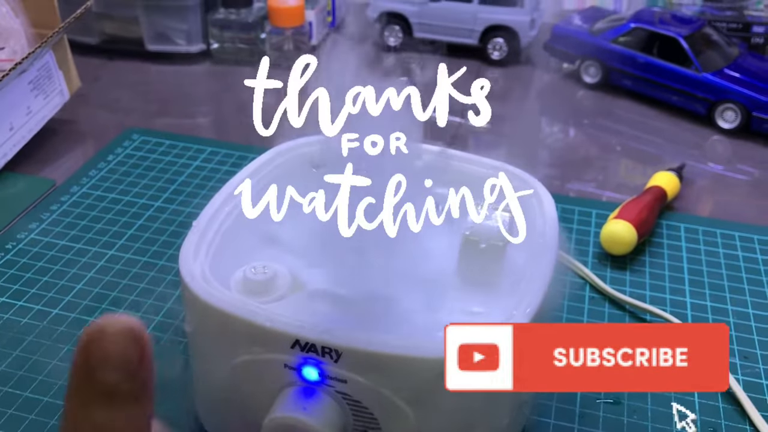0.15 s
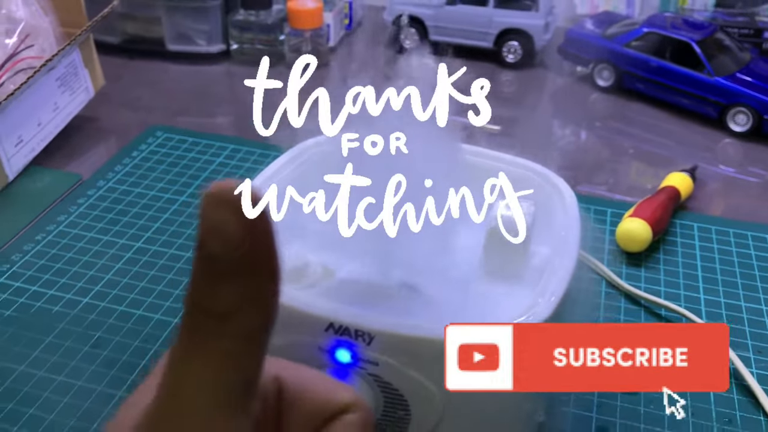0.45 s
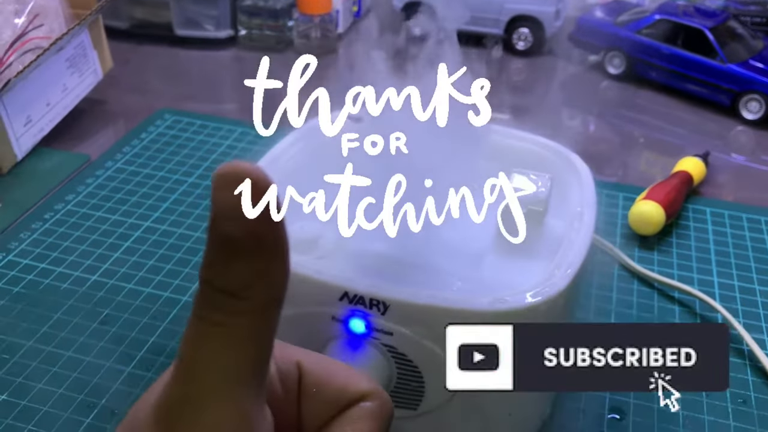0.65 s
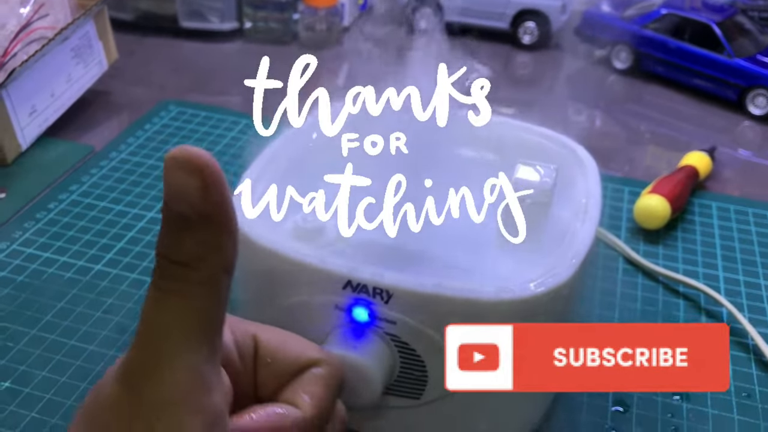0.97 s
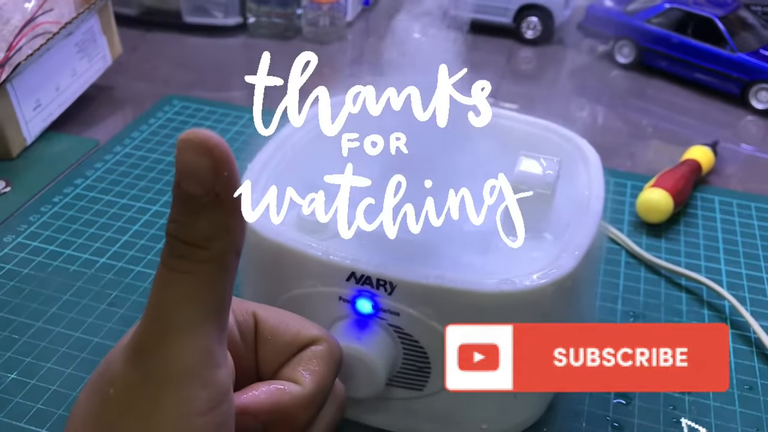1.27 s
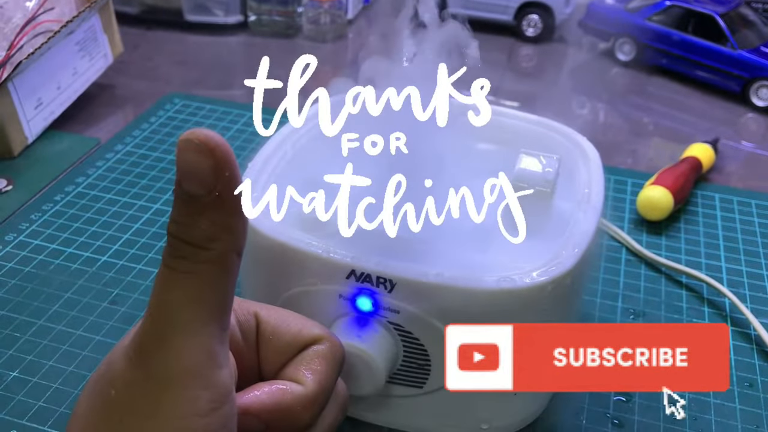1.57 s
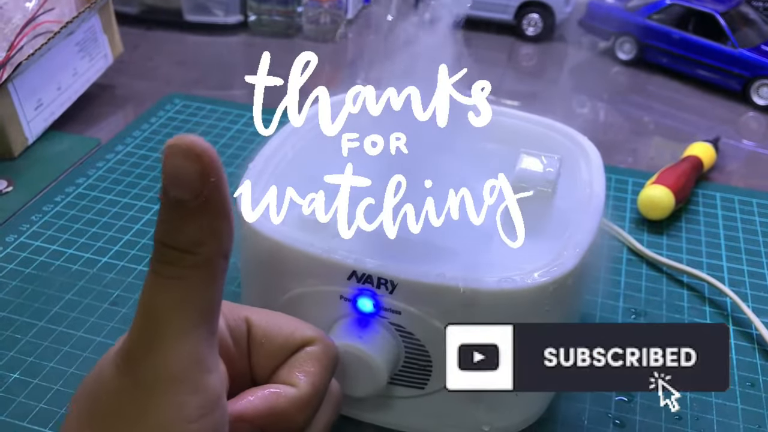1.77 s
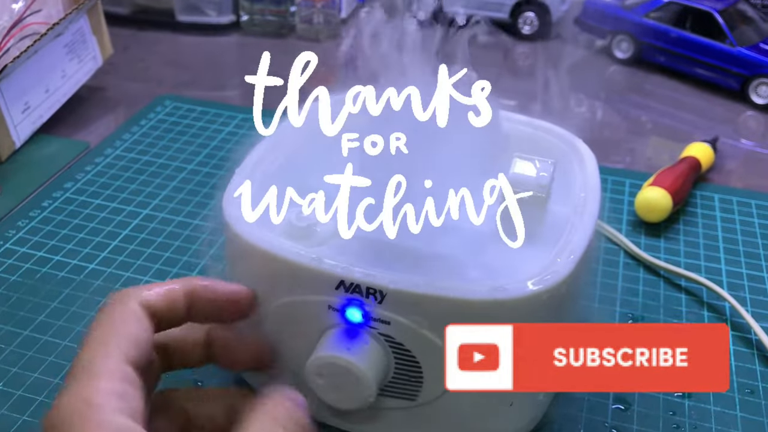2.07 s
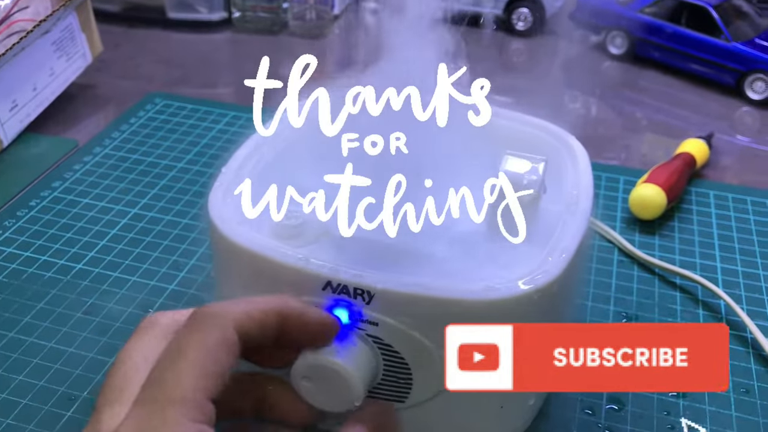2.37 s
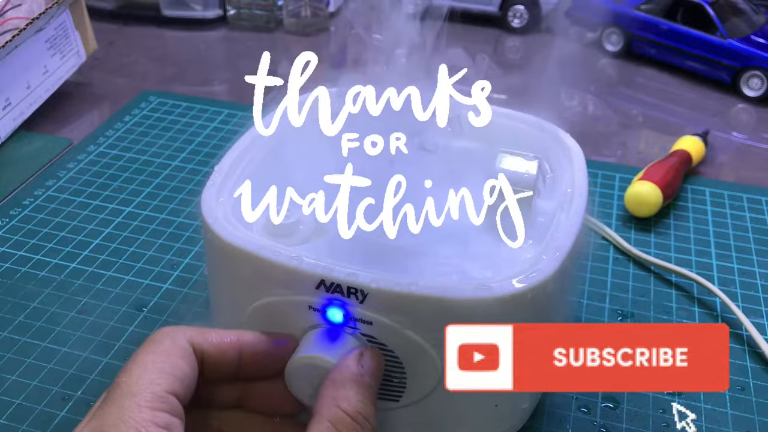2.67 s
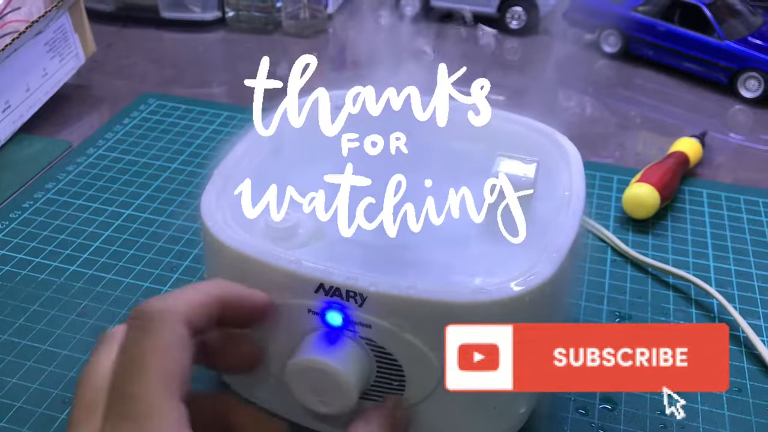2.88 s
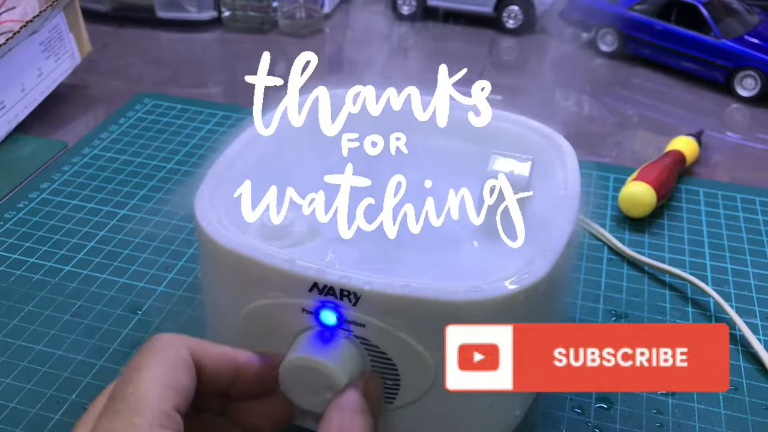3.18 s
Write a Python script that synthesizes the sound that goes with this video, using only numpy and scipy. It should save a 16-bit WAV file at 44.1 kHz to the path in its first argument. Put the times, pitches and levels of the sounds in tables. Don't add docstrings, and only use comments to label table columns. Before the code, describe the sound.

Close up on a desk, a small humidifier sprays bright, fizzing mist with sharp droplet snaps; one watery gulp, then a hard plastic click, smaller knob taps and a dull bump before the spray dies down.

```python
import sys
import numpy as np
from scipy import signal
from scipy.fft import rfft, irfft
from scipy.io import wavfile

SR = 44100
rng = np.random.default_rng(int(sys.argv[2]) if len(sys.argv) > 2 else 0)


def master_out(mix):
    frames = np.transpose(np.atleast_2d(mix))
    ceiling = np.clip(frames, -1, 1)
    pcm = np.round(ceiling * 32767).astype(np.int16)
    wavfile.write(sys.argv[1], SR, pcm)


def boost(x):
    u = np.asarray(x, float) / 20
    return 10 ** u


N = 146853


def rms_one(x):
    return x / np.sqrt(np.mean(x ** 2) + 1e-20)


def drift(rate):
    pole = np.exp(-80 * np.pi * rate / SR)
    slow = signal.lfilter([1], [1, -2 * pole, pole * pole], rng.standard_normal(N // 40 + 2002))[2000:]
    return np.interp(np.arange(N) / 40, np.arange(len(slow)), rms_one(slow - slow.mean()))


def ring(clicks, hz, t60):
    r, w = boost(-60 / (t60 * SR)), 2 * np.pi * hz / SR
    return signal.lfilter([0, np.sin(w)], [1, -2 * r * np.cos(w), r * r], clicks + 1e-18)


def coloured(spectrum, patchy_db, shared_db):
    hz = np.arange(N // 2 + 1) * SR / N + 1e-3
    at, db = np.transpose(spectrum)
    noise = rfft(rng.standard_normal(N)) * boost(np.interp(np.log(hz), np.log(at), db, -200, -200))
    place = 2 * np.log2(hz / at[0])
    out = 0
    for k in range(int(2 * np.log2(at[-1] / at[0])) + 2):
        strip = np.cos(np.pi / 2 * np.clip(place - k, -1, 1)) ** 2
        out = out + boost(patchy_db * drift(22)) * irfft(noise * strip, N)
    return rms_one(out * boost(shared_db * drift(22)))


def add(track, s, x):
    i = int(s * SR)
    track[i:i + len(x)] += x[:len(track) - i]


# (frequency [Hz], density [dB per Hz])
ROOM_RUMBLE = [(24, -15), (30, -5.5), (60, -3), (86, -3.5), (100, -10.5), (125, -8.5), (330, -13),
               (430, -62)]
# (frequency [Hz], density [dB per Hz])
FAN_AIR = [(190, -52), (330, -13), (424, -1.5), (532, -18), (583, -6), (918, -18.5), (950, -16.5),
           (1030, -14.5), (5000, -28), (6500, -27), (11000, -120)]
# (frequency [Hz], width [Hz], level [dB rms])
TANK_RESONANCES = [(387.3, 48.5, -71), (432, 39, -68), (466.3, 53, -79), (571.3, 52, -82), (1251, 45, -83),
                   (776, 48, -85), (2660, 590, -80), (123.3, 19, -79), (302.5, 16, -79)]
# (frequency [Hz], level [dB rms], waver [dB])
MOTOR_TONES = [(60.4, -64, 3), (34.5, -70.5, 0.5), (82.7, -75, 4), (973.5, -80.5, 4), (1944, -90, 5),
               (2670, -89.5, 7), (218, -86.5, 0.5)]


def fan():
    out = boost(-67.5) * coloured(ROOM_RUMBLE, 0, 0) + boost(-69) * coloured(FAN_AIR, 0.51, 0.89)
    for hz, width_hz, db in TANK_RESONANCES:
        t60 = 1.8 / width_hz
        stirred = ring(ring(rng.standard_normal(N), hz, t60), hz, t60)
        out += boost(db) * rms_one(stirred)
    for hz, db, waver_db in MOTOR_TONES:
        level = np.sqrt(2) * boost(db + waver_db * np.tanh(drift(4)))
        speed = 1 + .002 * drift(3.74)
        out += level * np.sin(2 * np.pi * np.cumsum(hz * speed) / SR)
    return out


# (time [s], hiss level [dB])
FOUNTAIN = [
    (0.0, -64),
    (0.33, -61),
    (0.62, -64),
    (1.32, -61.5),
    (1.68, -63),
    (2.22, -62),
    (2.87, -66),
    (3.0, -68),
    (3.33, -74),
]


def vigour():
    return np.interp(np.arange(N) / SR, *np.transpose(FOUNTAIN))


# (frequency [Hz], density [dB per Hz])
HISS_COLOUR = [(3000, -5.5), (4020, -9.5), (8200, -8), (9700, -5), (10400, -9), (11500, -4.5),
               (15000, -1.5), (16500, 2)]


def hiss(mist_db):
    return boost(mist_db - 2.0) * coloured(HISS_COLOUR, 1.7, 1.0)


def spray(mist_db):
    per_s, level_db, spread_db, follows = 180, 2.5, 4.5, 1.6
    sizes = boost(spread_db * np.minimum(rng.exponential(1, N), 2.8)) * rng.choice([-1, 1], N)
    density_db = 5 * drift(8) + follows * (mist_db - mist_db.mean())
    born = rng.random(N) < per_s * boost(density_db) / SR
    dealt = rng.integers(0, 12, N)
    rings = np.zeros(N)
    for k, hz in enumerate(np.geomspace(11800, 15600, 12)):
        soft_clicks = ring(sizes * born * (dealt == k), hz, 8 / hz) * hz / SR
        rings += ring(soft_clicks, hz, 18 / hz)
    return boost(mist_db + level_db) * rings


# (time [s], peak level
# [dB], pitch [Hz], snap [dB])
BURSTS = [(0.2473, -43, 15000, 9), (0.293, -46.5, 4220, -15), (0.3673, -36, 15000, 7),
          (0.398, -39, 6930, 4.5), (0.426, -52, 10600, 11), (0.4354, -38.5, 12560, 4),
          (0.4858, -47, 14600, 1), (0.5975, -46.5, 11700, 8), (0.6868, -48, 11800, 5),
          (0.7826, -42, 15100, 4), (0.959, -37, 14100, 1), (1.0924, -40.5, 12100, -3),
          (1.3578, -44.5, 11300, 4), (1.4094, -44, 15700, -6), (1.444, -34.5, 15500, -2),
          (1.5484, -48.5, 12200, 9), (1.6267, -34.5, 14100, 1), (1.8716, -44, 8800, 5),
          (1.9106, -40, 15300, -3), (1.9415, -36.5, 14300, -1), (2.034, -35, 13900, -3),
          (2.0677, -39, 9050, -14), (2.2024, -43, 13900, 7), (2.221, -39, 9000, 2),
          (2.3156, -45, 10000, 7.5), (2.5476, -48.5, 9700, 2), (2.6738, -41, 13800, -3),
          (2.9317, -43.5, 13600, 8),
          (.2926, -54.5, 3300, -10), (.398, -55, 4200, -12), (0.4, -47, 7500, -6),
               (0.401, -48, 6200, -2), (.558, -54.5, 3730, -2), (1.172, -54, 7200, -8),
               (1.3838, -49.5, 8900, 10), (1.9392, -55, 4750, -10), (2.0465, -42, 12200, -6),
               (2.080, -49, 13500, 2), (2.224, -44.5, 9400, 7), (2.2515, -51, 11500, 2),
               (2.428, -57, 6150, -10), (2.5735, -48, 14200, 4), (2.593, -59, 3720, 0),
               (2.7911, -51, 14500, 4), (2.799, -50, 14500, 6), (2.806, -47, 14000, 3),
               (2.806, -57, 8500, 3), (2.9148, -47, 13900, 3), (2.927, -49, 3230, -7),
               (2.9404, -59, 10100, 19), (3.251, -59, 11600, 4)]
# (time [s], peak level [dB], pitch [Hz], snap
# [dB])
MORE_BURSTS = [
    (2.0352, -48, 9300, 8),
    (2.0583, -44, 11300, 6),
    (2.0584, -44, 14000, 0),
    (2.059, -44, 8000, -8),
    (3.1979, -42, 11300, 3),
    (3.198, -48, 15000, 0),
]


def drops():
    ring_cycles, pitch_rise, lag_s, snap_s = 20, .1, .0011, .0005
    events = BURSTS + MORE_BURSTS
    out, t = np.zeros(N), np.arange(900) / SR
    snaps = np.diff(rng.standard_normal((len(events), 901))) * np.exp(-t / snap_s)
    for (s, db, hz, snap_db), snap in zip(events, snaps):
        cycles = hz * t
        pitch = 1 - pitch_rise * np.exp(-4 * cycles / ring_cycles)
        envelope = boost(-30 * cycles / ring_cycles) * np.minimum(cycles / 2, 1)
        tone = np.sin(2 * np.pi * np.cumsum(hz * pitch) / SR) * envelope
        band = signal.butter(4, [.9 * hz, min(1.6 * hz, 18000)], "band", fs=SR, output="sos")
        snap = signal.sosfilt(band, snap)
        add(out, s + lag_s, boost(db) * (tone + boost(snap_db) * .5 * snap / np.abs(snap).max()))
    return out


# (start [s], peak level [dB], frequency [Hz], length [s])
DESK_BUMPS = [
    (1.385, -52, 68, .08),
    (2.914, -46.5, 63, .097),
    (3.028, -53, 62, .065),
    (3.112, -57, 55, .07),
]


def bumps():
    out = np.zeros(N)
    for s, db, hz, length in DESK_BUMPS:
        t = np.arange(int(length * SR)) / SR
        add(out, s, boost(db) * np.sin(np.pi * t / length) ** 2 * np.cos(2 * np.pi * hz * t))
    return out


# (time [s], peak level [dB], crack [Hz], shell ring [dB], high tick [dB])
KNOB_TAPS = [(1.3853, -44, 3000, -4, -16), (2.0597, -34.5, 2000, -6, -8), (2.0594, -44, 5600, -20, -8),
             (2.1188, -53, 800, -6, -14), (2.1222, -52, 700, -10, -20), (2.5395, -58, 1500, -4, -4),
             (2.7921, -46, 4600, -16, -5), (2.7929, -47, 1100, -5, -20), (2.7952, -48, 800, -12, -20),
             (2.837, -61, 1800, -8, -6), (2.9298, -57, 900, -8, -20)]
# (frequency [Hz], level [dB], t60 [s])
SHELL_MODES = [(690, -2.5, 0.01), (810, -1.5, 0.015), (1003, -4, 0.018), (1106, 1, 0.033),
               (1437, 5.5, 0.015), (1626, -2, 0.029), (2026, -1.5, 0.0067), (2347, -16, 0.11),
               (2650, 3, 0.0067), (3300, -7.5, 0.021), (3510, -6, 0.014), (4200, -6.5, 0.015),
               (4750, -2.5, 0.011), (5780, 5.5, 0.0022)]


def hand():
    crack_cycles, tick_s = 6, .0002
    out, t = np.zeros(N), np.arange(600) / SR
    s, db, crack_hz, ring_db, tick_db = np.transpose(KNOB_TAPS)
    chance_db = rng.normal(0, 1.5, (len(s), len(SHELL_MODES)))
    for k, (hz, level_db, t60) in enumerate(SHELL_MODES):
        clicks = np.zeros(N)
        strength = boost(db + ring_db + level_db - 6 + chance_db[:, k])
        clicks[(s * SR).astype(int)] = strength * (-1) ** k
        out += ring(clicks, hz, t60)
    ticks = np.diff(rng.standard_normal((len(s), 601))) * np.exp(-t / tick_s)
    for at, level_db, hz, high_db, tick in zip(s, db, crack_hz, tick_db, ticks):
        crack = np.sin(2 * np.pi * hz * t) * boost(-60 * hz * t / crack_cycles + 2)
        add(out, at, boost(level_db) * (crack + boost(high_db) * tick / np.abs(tick).max()))
    return out


# (time [s], peak level [dB], start [Hz], end [Hz], hold [s])
BUBBLE = (1.3856, -38.5, 1185, 1245, .0102)


def gulp():
    attack_s, release_s, under_t60_s = .0007, .0024, .045
    out, t = np.zeros(N), np.arange(2000) / SR
    s, db, from_hz, to_hz, hold = BUBBLE
    phase = 2 * np.pi * np.cumsum(from_hz + (to_hz - from_hz) * np.minimum(t / hold, 1.3)) / SR
    glide = np.sin(phase) + boost(-22) * np.sin(2 * phase)
    glide *= np.exp(-np.maximum(t - hold, 0) / release_s)
    dying_db = -60 * t / under_t60_s
    water = boost(-2.5 + dying_db) * np.sin(2 * np.pi * 1080 * t)
    wall = boost(-6 + dying_db) * np.sin(2 * np.pi * 790 * t)
    add(out, s, boost(db) * np.minimum(t / attack_s, 1) * (glide + water + wall))
    return out


def room(x):
    t60_s, level_db, gap_s = .11, -7, .003
    t = np.arange(SR // 4) / SR
    tail = rng.standard_normal(len(t)) * boost(-60 * t / t60_s) * np.clip(t / gap_s - .5, 0, 1)
    return x + boost(level_db) * signal.fftconvolve(x, tail / np.sqrt(np.sum(tail ** 2)))[:N]


def scene():
    mist_db = vigour()
    high_pass = signal.butter(2, 500, "high", fs=SR, output="sos")
    near = signal.sosfilt(high_pass, spray(mist_db) + drops() + hand())
    gulp_dry = .75
    bubble = gulp_dry * gulp() + (1 - gulp_dry) * room(gulp())
    return (fan() + hiss(mist_db) + bumps() + room(near) + bubble)[None]


def band_limit(x):
    return signal.sosfilt(signal.butter(12, 16810, fs=SR, output="sos"), x)


def record(dry):
    dry = signal.sosfilt(signal.butter(4, 26, "high", fs=SR, output="sos"), dry)
    dry = signal.sosfilt(signal.cheby2(22, 36, 15915, fs=SR, output="sos"), dry)
    return band_limit(dry)


dry = scene()
out = record(dry)
master_out(out)
```